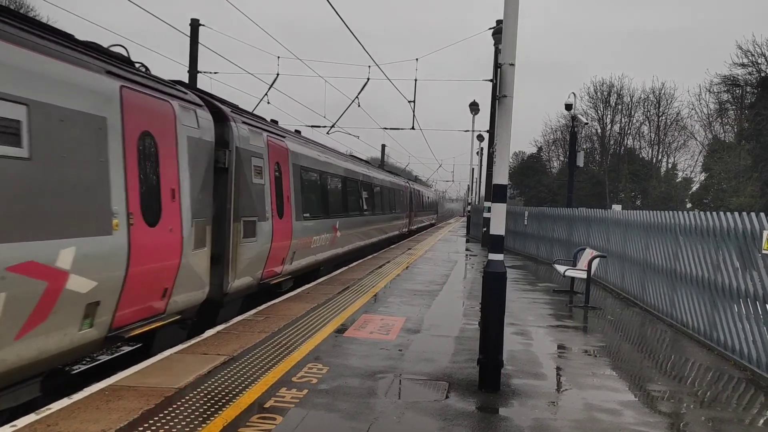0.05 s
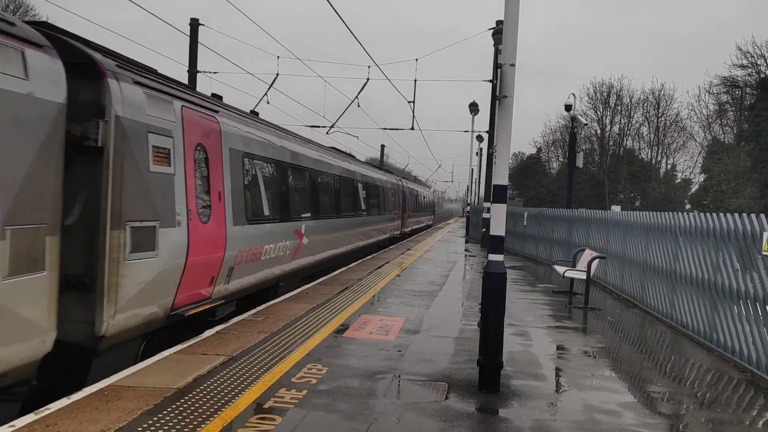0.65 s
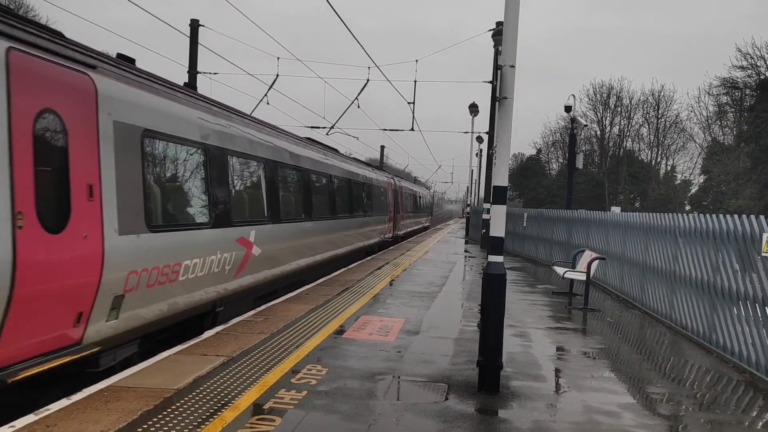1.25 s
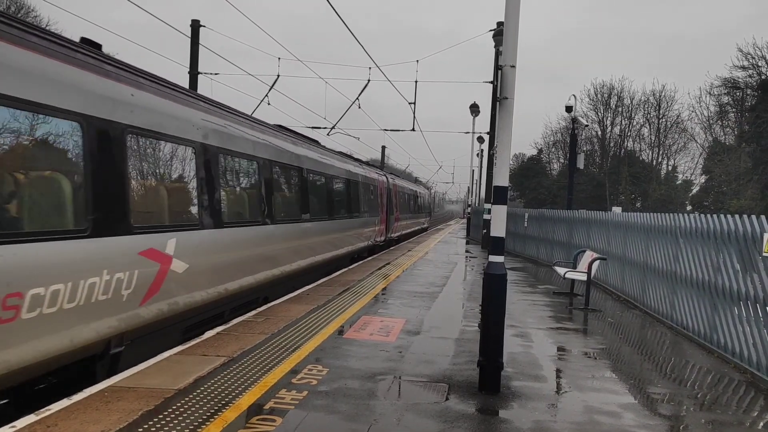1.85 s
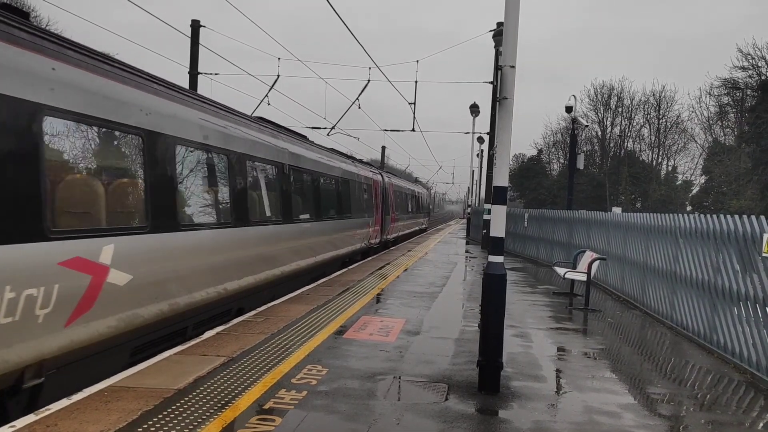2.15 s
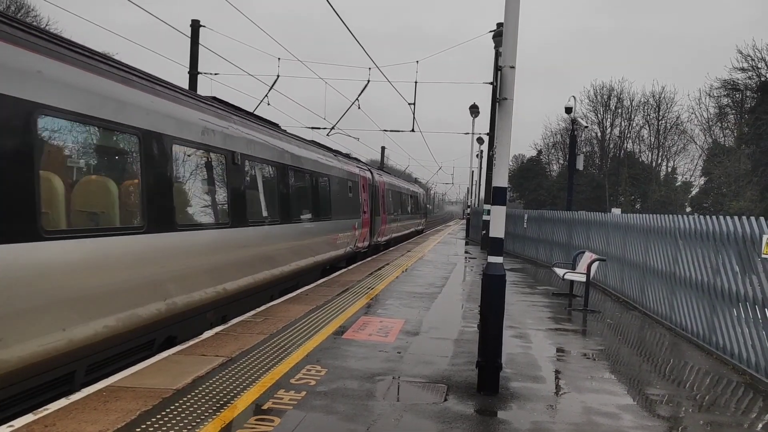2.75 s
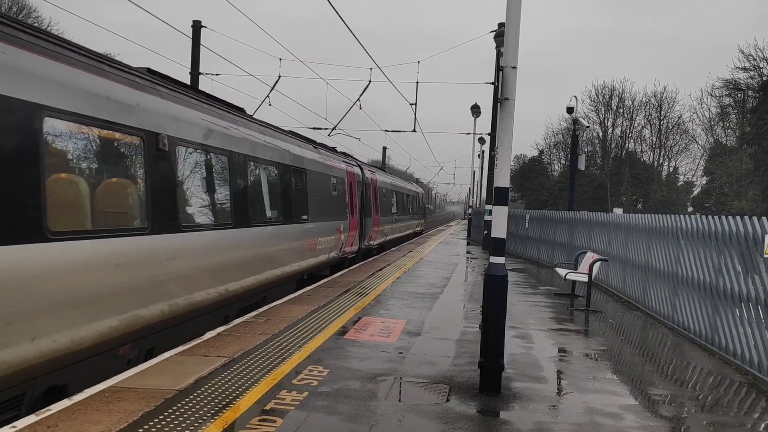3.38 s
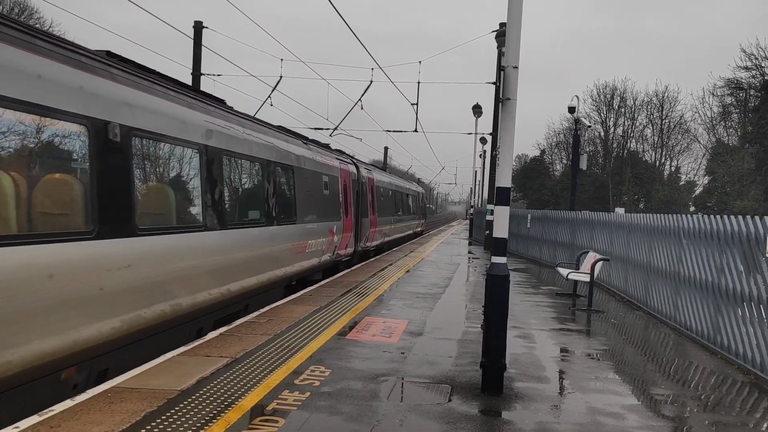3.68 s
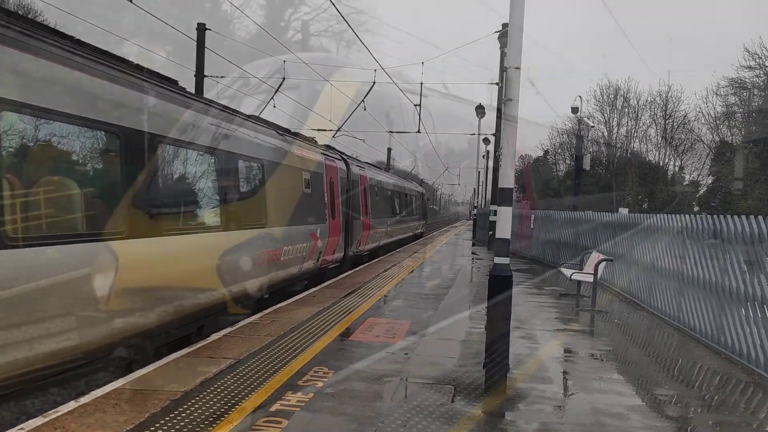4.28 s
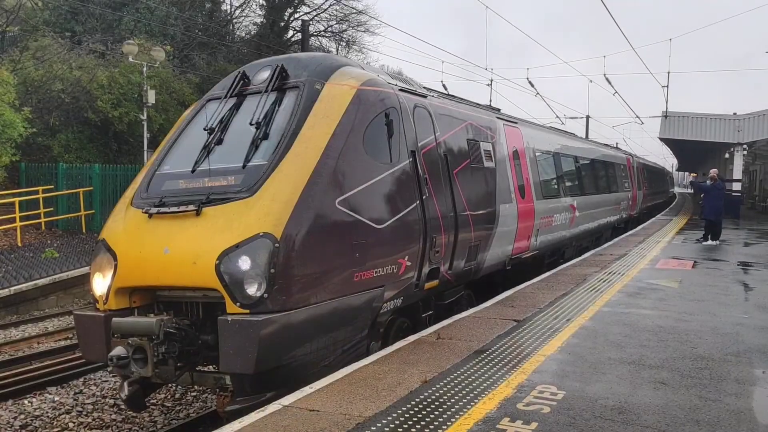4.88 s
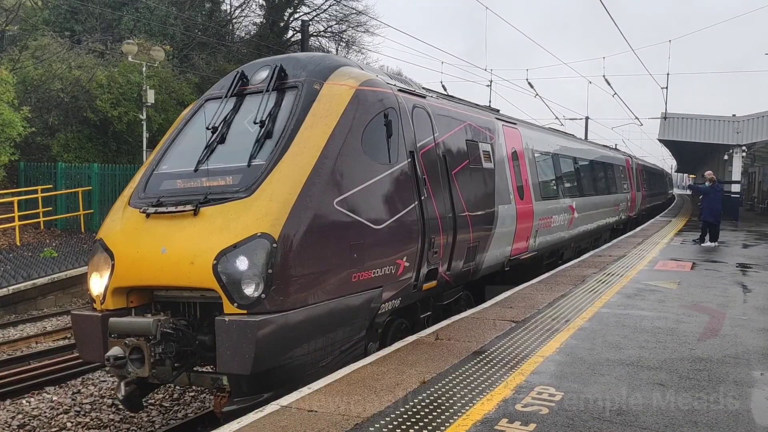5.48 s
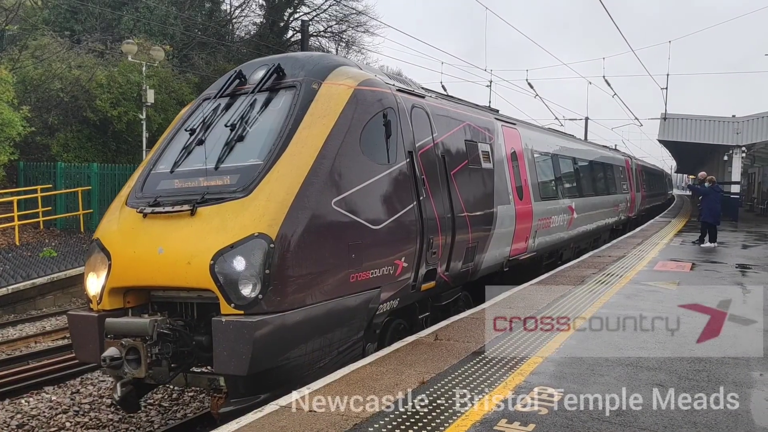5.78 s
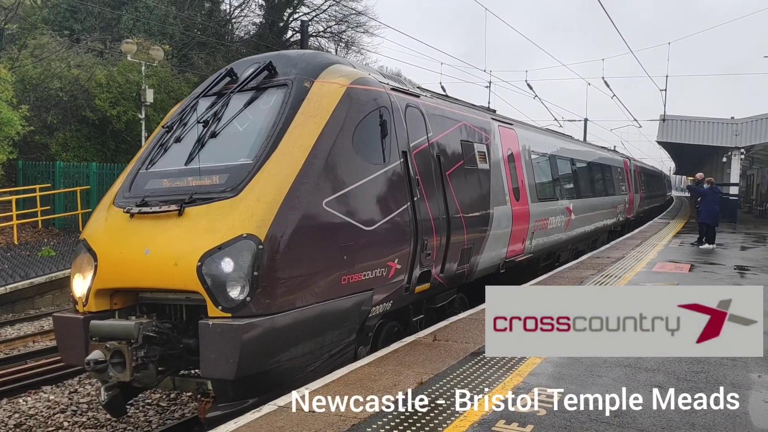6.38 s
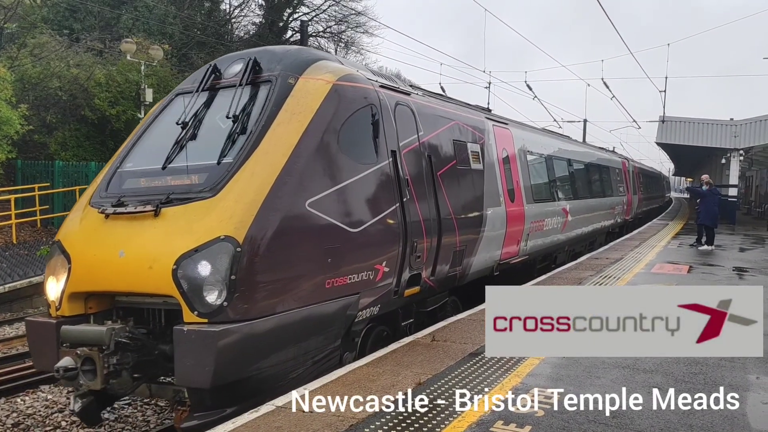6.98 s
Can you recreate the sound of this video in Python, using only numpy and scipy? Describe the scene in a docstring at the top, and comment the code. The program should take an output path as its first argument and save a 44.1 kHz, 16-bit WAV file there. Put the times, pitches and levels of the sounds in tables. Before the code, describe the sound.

A diesel passenger train rolls by on wet rails with a deep throbbing drone, then eases to a quieter hum with short air spits.

```python
"""A lumpy diesel drone, fan roar and wheel hiss on wet rail: a multiple unit rolls by, close on the left.
Its six-cylinder underfloor engines idle slightly out of step, so their tones beat, and shake the floor.
Steel wheels ring, a brake pad brushes its disc and a cooling fan goes by. The sound then eases to the
quieter nose of the train, with faint gear whine, short spits of valve air and a singing brake."""
import sys
import numpy as np
from scipy import signal
from scipy.fft import rfft, irfft
from scipy.io import wavfile
from scipy.ndimage import map_coordinates

SR = 44100
rng = np.random.default_rng(int(sys.argv[2]) if len(sys.argv) > 2 else 0)


def int16_out(signal):
    """Quantize to a 16-bit WAV file."""
    q = np.round(np.clip(np.atleast_2d(signal).T, -1, 1) * 32767)
    wavfile.write(sys.argv[1], SR, q.astype(np.int16))


N = 310464
T = np.arange(N) / SR
HZ = np.maximum(np.fft.rfftfreq(N, 1 / SR), 1)
NOSE_FROM_S, NOSE_TO_S = 4.26, 4.97  # crossfade from coaches to nose

# Engine speed. Each row: time in seconds, firing rate in Hz.
FIRING_HZ = [(0, 57.2), (2, 57.5), (4.2, 57.5), (4.8, 57.1), (7.04, 56.9)]
# Exhaust tones. Each entry: order, in periods per engine cycle.
EXHAUST_ORDERS = [6, 12, 14, 18, 20, 24, 26]
# Those orders beside the coaches. Each row: level in dB, lift at the outlet in dB, lift at the bay in dB,
# second engine's amplitude ratio, time of a beat minimum in seconds.
COACH_EXHAUST = [(-26.5, 3.5, 2.2, 0.68, 3.574), (-31.5, 4, 5.5, 0.67, 3.37), (-39.5, 11, 6.5, 0.6, 3.33),
                 (-39, 7.5, 3, 0.33, 3.16), (-46.5, 11, -1, 0.5, 3.34), (-38, 2.5, -4, 0.35, 3.3),
                 (-43, 2.5, -2, 0.37, 3.3)]
# Those orders at the nose. Each row: level in dB, second engine's amplitude ratio,
# time of a beat minimum in seconds.
NOSE_EXHAUST = [(-39, 0.1, 9), (-31.5, 0.22, 6.65), (-45.5, 0.06, 4.7), (-37, 0.28, 5.45), (-49.5, 0, 5.43),
                (-40.5, 0.17, 5.7), (-47.5, 0.06, 5.36)]
# Brief booms in the hum. Each row: time in seconds, swell in seconds, pitch in Hz, lift in dB.
HUM_BOOMS = [(.16, 0.15, 170.8, 11), (.4, 0.026, 230, 12), (.73, .16, 171, 8), (1.76, .04, 230, 14),
             (2.35, .08, 171, 4), (4.48, 0.19, 133, 8)]
# Underframe shake. Each row: time in seconds, relative rumble level in dB, drone level in dB.
SHAKE_DB = [(0.05, -27, -37), (0.07, -28.5, -29.5), (1.79, -34.5, -32), (2.62, -34.5, -34),
            (3.59, -34.5, -34), (5.3, -44.5, -39), (5.72, -38.5, -37), (7.0, -42.5, -33.5)]
# Fan and wheel spray loudness. Each row: time in seconds, relative level in dB.
FAN_DB = [(0.03, -33.5), (0.71, -33.5), (0.77, -34), (1.76, -38.5), (3.09, -39), (3.92, -37.5), (4.81, -45),
          (6.75, -44), (6.85, -43)]
SPRAY_DB = [(0.03, -41), (1.74, -48.5), (3.27, -49), (4.05, -45.5), (4.37, -47), (4.7, -50.5), (5.74, -54),
            (6.5, -52)]
# Noise spectra. Each row: frequency in Hz, relative level in dB.
RUMBLE_SPECTRUM = [(8, -16), (14, -13), (22, -3), (32, 5), (40, 8.5), (49, 10.5), (60, 1), (78, -1),
                   (100, -14.5), (150, -38.5)]
DRONE_SPECTRUM = [(50, -31), (90, -3.5), (150, 1.5), (195, 1), (240, -0.5), (275, -2), (305, -9.5),
                  (345, -13.5), (450, -28.5), (700, -54)]
COACH_FAN_SPECTRUM = [(200, -8.5), (340, -0.5), (480, 0.5), (650, -2), (830, -1.5), (1050, -3), (1400, -8),
                      (1700, -8), (2000, -8.5), (2700, -9.5), (3300, -11), (3900, -25), (6000, -58)]
NOSE_FAN_SPECTRUM = [(200, -12), (370, 0), (440, -1.5), (640, -4.5), (850, -7), (1100, 2), (1450, -6),
                     (1750, -14.5), (2000, -8), (3200, -9.5), (3800, -36), (6000, -44)]
COACH_SPRAY_SPECTRUM = [(2000, -7.5), (3400, -2.5), (4040, -3), (6720, -2.5), (7850, -6), (9400, -2.5),
                        (13700, -20), (14200, -57)]
NOSE_SPRAY_SPECTRUM = [(2000, -31), (3400, -1.5), (3810, -7), (4990, -3), (6930, -4.5), (8700, -2),
                       (9230, -3.5), (9980, -9), (12100, -17), (13500, -24), (14200, -12.5)]
# Modes of engine casing and ducts, cooler housing and brake disc.
# Each row: centre in Hz, width in Hz, relative gain in dB.
COACH_CASING_MODES = [(845, 130, 3), (1023, 29, -6), (1667, 122, 2.5)]
NOSE_CASING_MODES = [(740, 6.8, -14), (883, 110, -1), (1078, 13, 3.5), (1664, 150, -5)]
COOLER_MODES = [(277, 19, -8.5), (297.7, 36, 4.5), (350, 36, -8), (386, 28, -12), (850, 310, -9.5),
                (1140, 180, -12), (1710, 126, -18.5)]
DISC_MODES = [(3200, 1500, -2), (5140, 90, 2), (5530, 480, 5), (7730, 60, 11), (11750, 700, 2),
              (12450, 900, -2), (13500, 900, -3)]
# Ringing steel: rolling wheels, a higher wheel mode near each bogie, a singing brake.
# Each row: time in seconds, pitch in Hz, level in dB.
WHEEL_TRACK = [(0, 2997, -41.5), (.65, 2990, -41), (1.2, 2932, -50.5), (2.4, 2983, -53), (3.2, 3056, -50),
               (3.9, 3068, -49), (4.4, 3170, -47), (4.9, 3265, -64), (7.04, 3370, -68)]
BOGIE_TRACK = [(0, 4860, -46), (.5, 4960, -53), (1.1, 4900, -75), (3.1, 4700, -71), (3.5, 4910, -57),
               (3.85, 5100, -52), (4.2, 5340, -71), (4.6, 5330, -78)]
BRAKE_TRACK = [(5.9, 3270, -73), (6.18, 3280, -65), (6.28, 3290, -54), (6.45, 3320, -62), (6.7, 3340, -64),
               (6.83, 3340, -53), (7.04, 3330, -57)]
# Passing cooling unit. Each row: time in seconds, level in dB.
COOLER_DB = [(1.6, -43.5), (2.7, -41.5), (3.3, -36), (3.9, -34), (4.3, -38.5), (4.8, -47), (7.04, -54)]
# Brake valve air. Each row: start in seconds, length in seconds, level in dB, centre in Hz, width in Hz.
VALVE_SPITS = [(2.634, .06, -54, 10250, 600), (4.937, .03, -48, 8000, 2400),
               (4.998, 0.014, -51, 9800, 1400), (5.064, 0.09, -45, 8300, 3200),
               (5.35, .04, -56, 9500, 4040), (6.6, 0.037, -49, 7510, 3500), (6.652, .02, -47, 7860, 3470),
               (6.895, 0.044, -48, 7300, 3500), (6.922, 0.018, -43.5, 8820, 1900)]
# Gear tones. Each entry: order, in periods per engine cycle; below, its level in dB relative to FAN_DB.
WHINE_ORDERS = [78, 90, 116, 180]
WHINE_DB = [-20, -12, -19, -21]
# Shading of the right side. Each row: frequency in Hz, left minus right in dB.
COACH_SHADE_DB = [(200, 3), (370, 3), (680, 1.5), (1240, 6), (2280, 16), (3600, 20), (5000, 14.5),
                  (6500, 24), (9500, 26), (14000, 16)]
NOSE_SHADE_DB = [(200, -3.5), (370, 12), (700, -1), (1240, 5), (2280, 13), (3600, 18.5), (5100, 16.5),
                 (8500, 28), (14000, 19)]
# Likeness of left and right. Each row: frequency in Hz, correlation from 0 to 1.
STEREO_CORRELATION = [(100, .998), (280, .978), (600, .85), (1300, .58), (3000, .25), (7000, .05)]


def undb(db):
    """Decibels to gain."""
    return 10 ** (np.asarray(db) / 20)


def unit(x):
    """Scale to rms 1 at the stereo centre."""
    return x / np.std(np.atleast_2d(x).mean(axis=0))


def curves(table):
    """Columns of a time table, one value per sample."""
    times_s, *columns = np.transpose(table)
    return [np.interp(T, times_s, column) for column in columns]


def across(points):
    """(Hz, value) points joined on a log-frequency axis."""
    hz, value = np.transpose(points)
    return np.interp(np.log(HZ), np.log(hz), value)


def resonances(modes):
    """Gain of steep-sided resonances."""
    return sum(undb(db) / (1 + ((HZ - hz) / width_hz) ** 2) ** 2.5 for hz, width_hz, db in modes)


def colour(x, gain):
    """Filter by a gain per frequency, then scale to rms 1."""
    return unit(irfft(rfft(x) * gain, N))


def walk(rate_hz):
    """Random drift below about rate_hz, spread 1."""
    return colour(rng.standard_normal(N), np.exp(-(HZ / rate_hz) ** 2))


def hiss():
    """Two independent white noises."""
    return rng.standard_normal((2, N))


def tone(cycle, order):
    """Sine of rms 1, order periods per engine cycle."""
    return np.sqrt(2) * np.sin(2 * np.pi * (order * cycle + rng.random()))


def swell(peak_s, width_s):
    """Bell curve, peak 1."""
    return np.exp(-((T - peak_s) / width_s) ** 2)


def ramp(start_s, end_s):
    """Linear rise from 0 to 1."""
    return np.clip((T - start_s) / (end_s - start_s), 0, 1)


def envelope(start_s, end_s, attack_s, release_s):
    """Attack from start_s, hold until end_s, release."""
    return ramp(start_s, start_s + attack_s) * (1 - ramp(end_s, end_s + release_s))


def spread(pair, shade_db, lag_s=-0.00023):
    """Independent pair to stereo: alike in the bass, duller and shifted by lag_s on the right."""
    correlation = across(STEREO_CORRELATION)
    mid, side = rfft(pair) * np.sqrt([1 + correlation, 1 - correlation])
    right_gain = undb(-across(shade_db))
    right = (mid - side) * right_gain * np.exp(-2j * np.pi * HZ * lag_s)
    return irfft(np.array([mid + side, right]) / (1 + right_gain), N)


def beating(cycle, order, firing_gap_hz, ratio, minimum_s, waver_db):
    """One order of two engines drifting in and out of step; higher orders beat faster."""
    drift_cycles = firing_gap_hz * (T - minimum_s) / 6
    beat = 1 - ratio * np.exp(2j * np.pi * order * drift_cycles)
    carrier = np.exp(2j * np.pi * (order * (cycle - drift_cycles / 2) + rng.random()))
    return np.sqrt(2) * np.imag(carrier * beat) * undb(waver_db * walk(5))


def boom_lift_db(hz, width_hz=14):
    """Brief lift of a tone lying near a boom's pitch."""
    return sum(db * swell(peak_s, swell_s) * np.exp(-((hz - boom_hz) / width_hz) ** 2)
               for peak_s, swell_s, boom_hz, db in HUM_BOOMS)


def exhaust(cycle, coach_gap_hz=0.97, nose_gap_hz=0.17, coach_pan_db=-0.4, nose_pan_db=-1.2):
    """Six firings a cycle hum on every sixth order; unequal cylinders add tones between."""
    outlet, bay = swell(0.72, 0.76), swell(3.21, 0.7)  # an exhaust outlet passes, then an engine bay
    cycle_hz = cycle[-1] / T[-1]
    coach = nose = 0
    for order, (db, outlet_db, bay_db, ratio, minimum_s) in zip(EXHAUST_ORDERS, COACH_EXHAUST):
        level_db = db + outlet_db * outlet + bay_db * bay + boom_lift_db(order * cycle_hz)
        masked_ratio = ratio * (1 - 0.7 * outlet)  # the near outlet drowns the second engine
        coach += beating(cycle, order, coach_gap_hz, masked_ratio, minimum_s, waver_db=1) * undb(level_db)
    for order, (db, ratio, minimum_s) in zip(EXHAUST_ORDERS, NOSE_EXHAUST):
        nose += beating(cycle, order, nose_gap_hz, ratio, minimum_s, waver_db=0.5) * undb(db)
    at_nose = ramp(4.08, 4.7)
    sides = np.array([[0.5], [-0.5]])
    return (1 - at_nose) * coach * undb(coach_pan_db * sides) + at_nose * nose * undb(nose_pan_db * sides)


def clatter(cycle, repeat, crank_db=2.0, scatter_db=2.75):
    """Noise whose power share `repeat` recurs each engine cycle, strongest on whole crankshaft orders."""
    size = 4096
    order = np.arange(size // 2 + 1)
    weight = undb(crank_db * np.cos(np.pi * order) + scatter_db * rng.standard_normal(len(order)))
    weight[:25:6] = 0  # the lowest firing orders belong to the exhaust
    patterns = irfft(weight * np.exp(2j * np.pi * rng.random((2, len(order)))))
    index = (cycle + 0.001 * walk(14)) % 1 * size  # combustion timing wobble blurs high orders
    looped = np.array([map_coordinates(p / p.std(), [index], order=1, mode="grid-wrap") for p in patterns])
    return np.sqrt(repeat) * looped + np.sqrt(1 - repeat) * hiss()


def underframe(cycle, nose_rumble_db=-2.5):
    """Engines shake the floor panels: deep rumble, coarse drone."""
    rumble_db, drone_db = curves(SHAKE_DB)
    rumble_db += 3 + nose_rumble_db * ramp(NOSE_FROM_S, NOSE_TO_S)
    rumble = colour(spread(clatter(cycle, repeat=0.69), NOSE_SHADE_DB), undb(across(RUMBLE_SPECTRUM)))
    drone = colour(spread(clatter(cycle, repeat=0.23), COACH_SHADE_DB), undb(across(DRONE_SPECTRUM)))
    return rumble * undb(rumble_db) + drone * undb(drone_db)


def fan_roar(cycle, spectrum, modes, shade_db, repeat, knock, ring_db, lag_s):
    """Fan air and combustion knock, pulsing with firings and crankshaft, ringing in casing and ducts."""
    pulsing = 1 + knock * (tone(cycle, order=6) + 1.5 * tone(cycle, order=2))
    air = spread(clatter(cycle, repeat) * pulsing, shade_db, lag_s)
    roar = colour(air, undb(across(spectrum)))
    ring = colour(air, resonances(modes)) * undb(ring_db)
    return unit(roar + ring) * undb(0.83 * walk(13.5))


def wet_rail(spectrum, shade_db, grain_db):
    """Wheels squeeze water off the rail: grainy hiss with a shifting echo off the platform."""
    spray = hiss() * undb(grain_db * walk(900))
    lag_s = 0.0005 + 0.00005 * walk(0.7)
    echo = np.array([np.interp(T - lag_s, T, side) for side in spray])
    stereo = spread(spray + 0.17 * echo, shade_db)
    return colour(stereo, undb(across(spectrum))) * undb(0.79 * walk(16))


def steel_ring(track, shade_db, width_hz):
    """Roughness rings a cluster of steel modes; its centre drifts as the wheels pass."""
    hz, db = curves(track)
    carrier = np.exp(2j * np.pi * np.cumsum(hz) / SR)
    pair = np.array([np.real((walk(width_hz) + 1j * walk(width_hz)) * carrier) for _ in range(2)])
    return unit(spread(pair, shade_db)) * undb(db)


def cooler(blade_hz=382):
    """Cooling fan: air booms in its housing around a wavering blade tone."""
    phase = 2 * np.pi * np.cumsum(blade_hz + 3.5 * walk(12)) / SR
    blade = np.sin(phase) * undb(3 * walk(8) - 9) * undb([[3], [-2]])
    housing = colour(spread(hiss(), COACH_SHADE_DB), resonances(COOLER_MODES))
    return (housing + blade) * undb(curves(COOLER_DB)[0])


def brake_rub(level_db=-45.5):
    """Pad friction excites the high modes of a brake disc."""
    contact = envelope(1.22, 1.71, attack_s=0.14, release_s=0.14)
    disc = colour(spread(hiss(), COACH_SHADE_DB), resonances(DISC_MODES))
    return disc * contact * undb(level_db + 1.2 * walk(40))


def air_spits(sputter_db=2.0):
    """Brake valves vent short, sputtering jets."""
    jet = spread(hiss() * undb(sputter_db * walk(300)), NOSE_SHADE_DB)
    spits = 0
    for start_s, length_s, db, hz, width_hz in VALVE_SPITS:
        gate = envelope(start_s, start_s + length_s, attack_s=0.006, release_s=0.016)
        spits += colour(jet, resonances([(hz, width_hz, 0)])) * undb(db) * gate
    return spits


def gear_whine(cycle, waver_db=3):
    """Engine gears whine faintly on high orders, wavering in level."""
    whine = sum(tone(cycle, order) * undb(db + waver_db * walk(7))
                for order, db in zip(WHINE_ORDERS, WHINE_DB))
    return whine * undb([[-1], [1]])


def scene():
    """Engines, wheels and brakes, first beside the coaches, then at the nose."""
    fan_db, spray_db = curves(FAN_DB)[0], curves(SPRAY_DB)[0]
    firing_hz = curves(FIRING_HZ)[0] * (1 + 0.0008 * walk(3))
    cycle = np.cumsum(firing_hz) / SR / 6  # engine cycles elapsed, six firings each

    coach = fan_roar(cycle, COACH_FAN_SPECTRUM, COACH_CASING_MODES, COACH_SHADE_DB,
                     repeat=0.36, knock=0.023, ring_db=-11, lag_s=-0.00014) * undb(fan_db + 1)
    coach += wet_rail(COACH_SPRAY_SPECTRUM, COACH_SHADE_DB, grain_db=0.6) * undb(spray_db + 3)
    nose = fan_roar(cycle, NOSE_FAN_SPECTRUM, NOSE_CASING_MODES, NOSE_SHADE_DB,
                    repeat=0.42, knock=0.018, ring_db=-8.5, lag_s=0.00005) * undb(fan_db + 0.2)
    nose += wet_rail(NOSE_SPRAY_SPECTRUM, NOSE_SHADE_DB, grain_db=-0.8) * undb(spray_db + 2)
    nose += gear_whine(cycle) * undb(fan_db)
    at_nose = ramp(NOSE_FROM_S, NOSE_TO_S)
    passing = np.sqrt(1 - at_nose) * coach + np.sqrt(at_nose) * nose

    engines = exhaust(cycle) + underframe(cycle) + cooler()
    steel = steel_ring(WHEEL_TRACK, COACH_SHADE_DB, width_hz=290)
    steel += steel_ring(BOGIE_TRACK, COACH_SHADE_DB, width_hz=400)
    steel += steel_ring(BRAKE_TRACK, NOSE_SHADE_DB, width_hz=130)
    return engines + passing + steel + brake_rub() + air_spits()


def record(dry):
    """Steep low-pass on the top treble."""
    cutoff_hz = 14200
    return signal.sosfilt(signal.ellip(12, 0.1, 80, cutoff_hz, fs=SR, output="sos"), dry)


dry = scene()
out = record(dry)
int16_out(out)
```